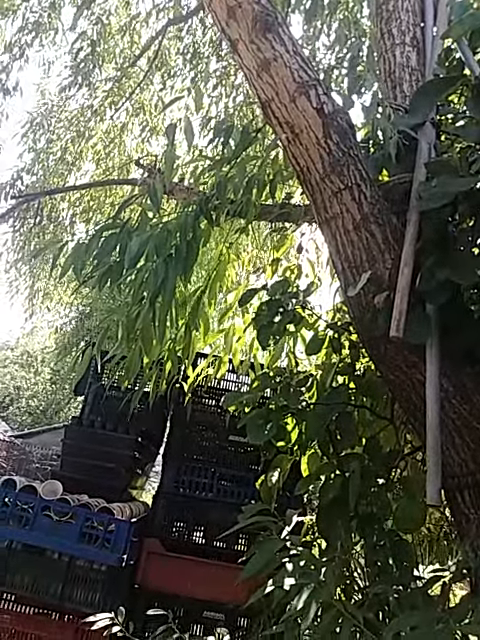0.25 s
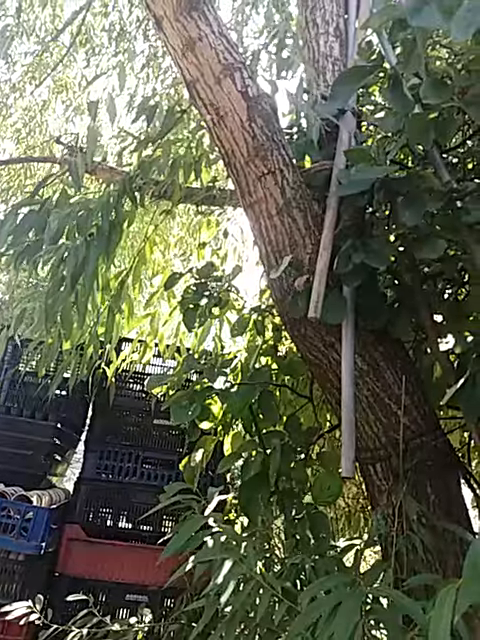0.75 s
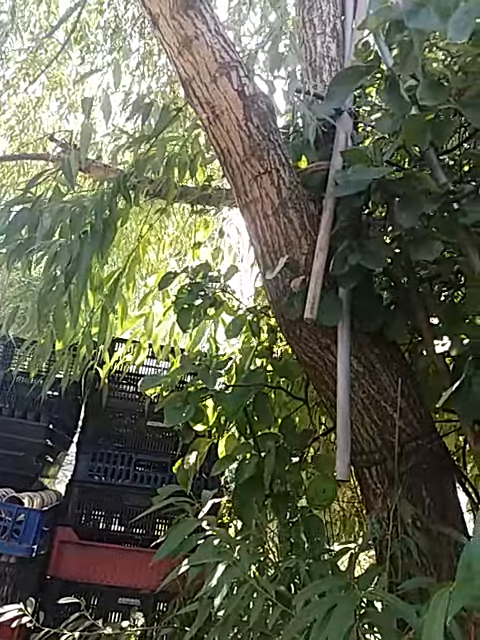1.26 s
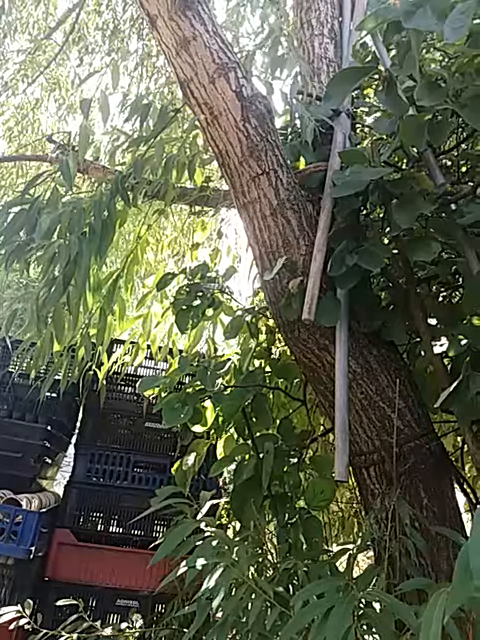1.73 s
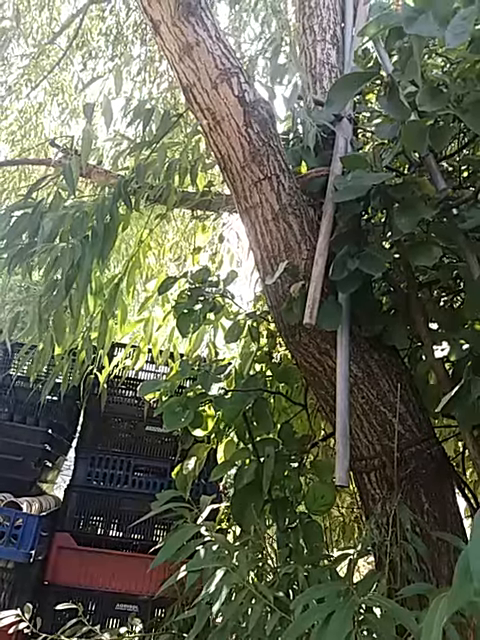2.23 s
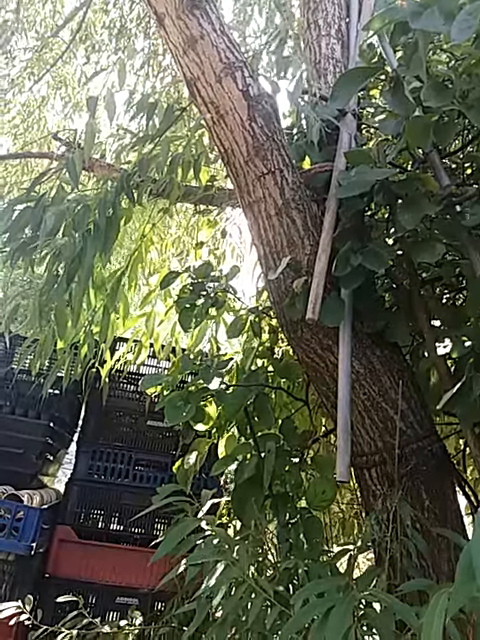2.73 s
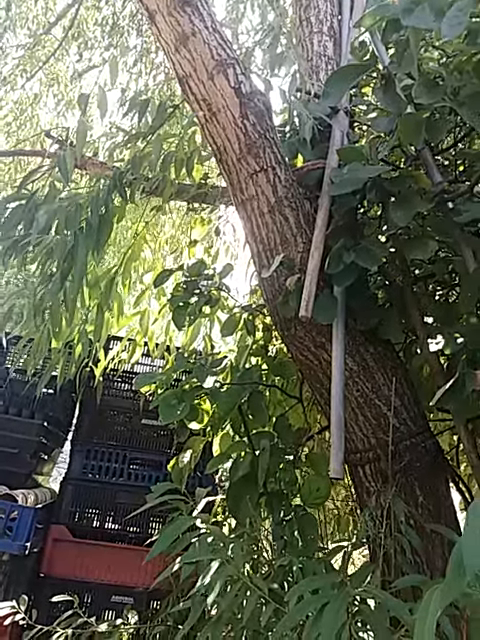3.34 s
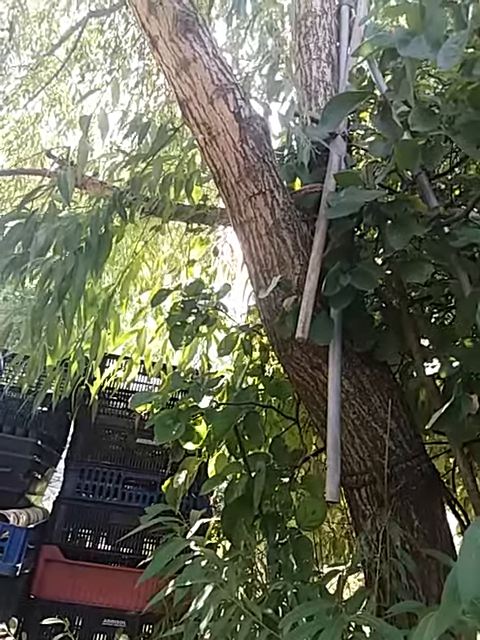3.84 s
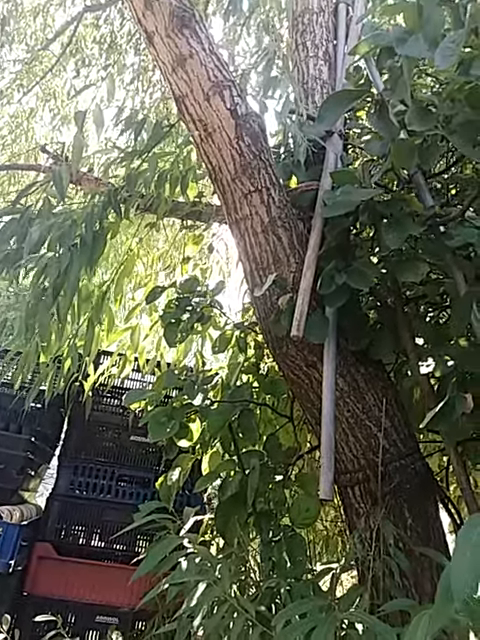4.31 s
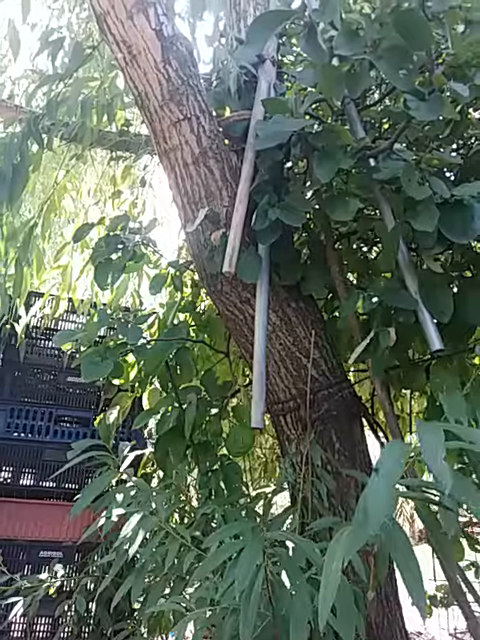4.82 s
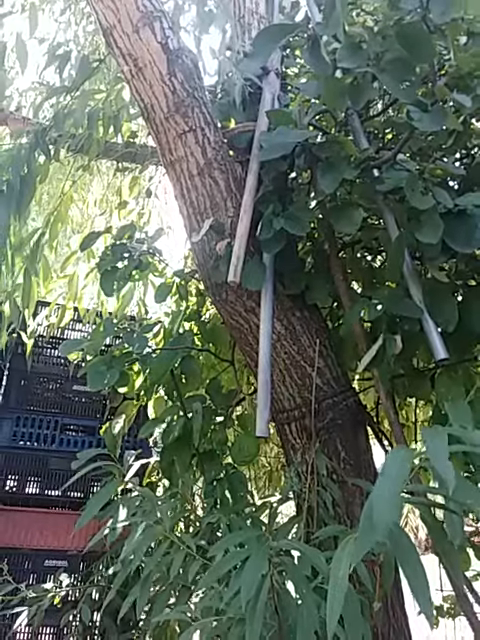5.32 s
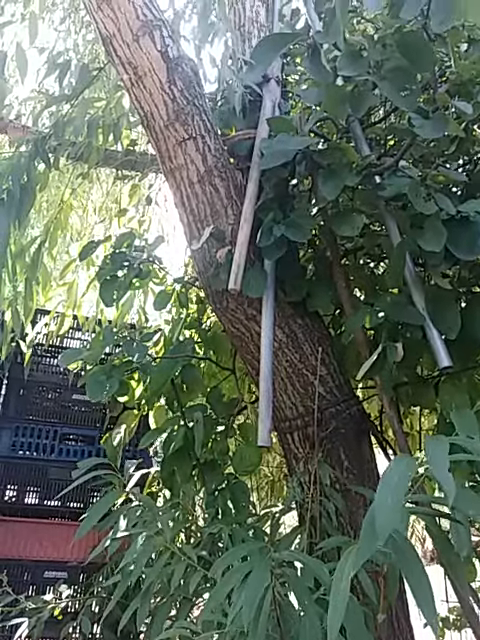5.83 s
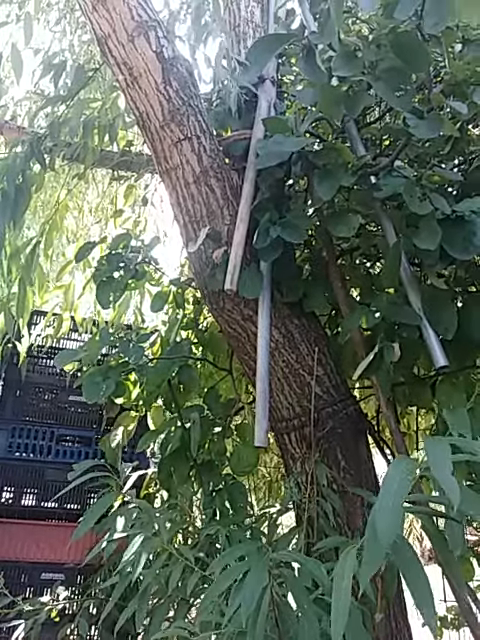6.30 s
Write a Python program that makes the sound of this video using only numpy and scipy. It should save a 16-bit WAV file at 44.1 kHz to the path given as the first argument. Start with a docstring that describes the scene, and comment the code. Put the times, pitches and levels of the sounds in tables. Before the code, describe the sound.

A quail repeats a crisp three-note whistled phrase about once a second in a quiet leafy yard, with soft echoes and faint hiss.

```python
"""A quiet outdoor floor is heard first, then the sound cuts in on a quail's phrase, 'wet-my-lips', in a leafy yard.
Each note is one pure whistle: a soft low lead-in, a hold near 1.8 kHz, then a snapping whip upward.
A husky murmur comes before the last note of each phrase. Echoes and scattered sound surround the bird.
Later a second take, with the bird heard from a new spot, cuts in mid-phrase.
Behind it are gliding far-bird chirps, short noise ticks and dull bumps, fluttering rumble and steady hiss."""
import sys
import numpy as np
from scipy import signal
from scipy.fft import rfft, irfft, next_fast_len
from scipy.io import wavfile
from scipy.ndimage import uniform_filter1d

SR = 44100
rng = np.random.default_rng(int(sys.argv[2]) if len(sys.argv) > 2 else 0)


def bounce(signal):
    """Save signal as a 16-bit WAV file at the path given by the first command-line argument."""
    frames = np.transpose(np.atleast_2d(signal))
    limited = np.clip(frames, -1, 1)
    pcm = np.round(limited * 32767).astype(np.int16)
    wavfile.write(sys.argv[1], SR, pcm)


N = 289296


def amp(db):
    """Turns decibels into a gain."""
    return 10 ** (np.asarray(db) / 20)


def evened(x):
    """Scales a sound to an average (rms) level of 1."""
    return x / np.sqrt(np.mean(x ** 2) + 1e-20)


def read(points, hz):
    """Reads a spectrum between its points, on a log-frequency axis."""
    f, value = np.transpose(points)
    return np.interp(np.log(hz + 1), np.log(f), value)


def colour(x, points):
    """Makes each frequency louder or softer by a spectrum in dB."""
    size = next_fast_len(len(x) + 2048)
    gain = amp(read(points, np.fft.rfftfreq(size, 1 / SR)))
    return irfft(rfft(x, size) * gain, size)[:len(x)]


def band(count, hz, octaves):
    """Makes noise whose spectrum is a bell around one frequency."""
    f = np.fft.rfftfreq(count, 1 / SR) + 1
    bell = np.exp(-.5 * (np.log2(f / hz) / octaves) ** 2)
    return evened(irfft(rfft(rng.standard_normal(count)) * bell, count))


def wander(count, per_s):
    """Joins random values by straight lines, per_s values each second."""
    t = np.arange(count) / SR
    knots = rng.standard_normal(4096)
    return np.interp(t * per_s, np.arange(len(knots)), knots)


def add(mix, s, sound):
    """Mixes a sound in, starting at s seconds."""
    part = mix[max(round(s * SR), 0):][:len(sound)]
    part += sound[:len(part)]


# Quail phrases: middle_note_s, level_db, opening_note_db (added to the level), held_pitch_hz,
# length_factor, murmur_level_db
QUAIL_PHRASES = [(0.4708, -15, -10, 1818, 1.07, -50), (1.4246, -14, -2.5, 1828, 1.12, -47.5),
                 (2.3548, -14, -3, 1824, 1.106, -47), (3.3443, -15, -2.5, 1828, 1.08, -47),
                 (4.6532, -15, -3, 1850, 1.04, -50.5), (5.6246, -15, -2.5, 1853, 1.09, -52),
                 (6.5695, -11.5, -3.5, 1850, .98, -53)]
# Notes of every phrase, 'wet', 'my', 'lips': offset_s from the middle note, pitch_factor, lead_in_db
THREE_NOTES = [(-.1838, .999, -6), (0, 1, 0), (.1413, 1.005, -1.5)]
# One more murmur after the first phrase: start_s, length_s, first_pitch_hz, last_pitch_hz, level_db
TRAILING_MURMUR = (.689, .075, 1086, 1150, -57)
# Edit cuts where each take of the bird opens abruptly: time_s
TAKE_OPENS = [0.333, 4.716]
# Colour of the direct path and echoes in each take: frequency_hz, gain_db
FIRST_PATH = [(1000, 0), (1600, -0.5), (1830, 1.5), (2100, -9), (2600, -0.1), (3200, -5), (4200, -0.8)]
SECOND_PATH = [(1000, -4), (1600, 0.5), (1830, 5.5), (2100, -3), (2600, -5.5), (3200, -11.5), (4200, -2.5)]
# Single echoes in each take: delay_ms, level_db
FIRST_ECHOES = [(2.42, -9.5), (5.57, -11), (8.39, -15), (16.08, -14), (35.61, -21), (41.27, -28),
                (107.7, -27)]
SECOND_ECHOES = [(1.73, -6.5), (8.07, -9.5), (14.72, -20), (16.63, -13.5), (35.03, -21), (84.8, -26),
                 (97.1, -29.5), (139, -30.5)]
SECOND_TAKE_S = 4.4  # calls from this time on belong to the second take
# The murmur: its start before the last note's whip, its length, and its pitch at each end
MURMUR_AHEAD_S, MURMUR_S, MURMUR_FROM_HZ, MURMUR_TO_HZ = .097, .08, 1010, 1043


def quail():
    """Sings three notes and a murmur per phrase, in two takes with different paths and echoes."""
    voice, t = np.zeros(N), np.arange(N) / SR
    for s, db, opening_db, hz, length, murmur_db in QUAIL_PHRASES:
        for k, (offset_s, pitch, lead_db) in enumerate(THREE_NOTES):
            note_db = db + opening_db * (k == 0)
            add(voice, *note(s + offset_s, note_db, hz * pitch, length, lead_db))
        murmur_start = s + THREE_NOTES[-1][0] - MURMUR_AHEAD_S
        add(voice, murmur_start, amp(murmur_db) * murmur(MURMUR_S, MURMUR_FROM_HZ, MURMUR_TO_HZ))
    s, length, first_hz, last_hz, db = TRAILING_MURMUR
    add(voice, s, amp(db) * murmur(length, first_hz, last_hz))
    first = yard(voice * (t < SECOND_TAKE_S), FIRST_PATH, FIRST_ECHOES, near_db=-3.0, far_db=-19.5)
    second = yard(voice * (t >= SECOND_TAKE_S), SECOND_PATH, SECOND_ECHOES, near_db=-4.5, far_db=-19.5)
    # each take is muted until its edit cut, then opens within 2 ms
    return sum(take * np.clip((t - cut) / .002, 0, 1) for take, cut in zip((first, second), TAKE_OPENS))


# Times here are stretched by the phrase's length factor; pitches are factors on the held pitch.
LEAD_S, LEAD_FROM, LEAD_TO, LEAD_DB = .017, .555, .71, -29  # soft low lead-in
HOLD_S, ATTACK_S, SCOOP_S = .0199, 0.016, .0033  # the whistle swells and scoops up to its held pitch
# Then it leaps along an S-curve: top pitch factor, steepest moment, time scale
WHIP_TOP, WHIP_MID_S, WHIP_S = 2.854, 0.0018, .0017
CREST_DB, CREST_S, RELEASE_S = 1.5, 0.0019, 0.0014  # a last push as it leaps, then it dies


def whistle(t):
    """Gives pitch factor, whistle gain and lead-in gain; t is in unstretched seconds from the whip."""
    held = np.maximum(t + HOLD_S, 0)
    lead = np.clip((t + HOLD_S + LEAD_S) / LEAD_S, 0, 1)
    pitch = LEAD_FROM + (LEAD_TO - LEAD_FROM) * lead
    pitch += (1 - LEAD_TO) * (1 - np.exp(-held / SCOOP_S))
    pitch += (WHIP_TOP - 1) / (1 + np.exp((WHIP_MID_S - t) / WHIP_S))
    attack = np.sin(np.pi / 2 * np.minimum(held / ATTACK_S, 1)) ** 2
    crest = amp(CREST_DB * np.exp(-.5 * (t / CREST_S) ** 2))
    release = np.exp(-.5 * (np.maximum(t, 0) / RELEASE_S) ** 2)
    return pitch, attack * crest * release, amp(LEAD_DB) * np.sin(np.pi * lead)


def note(s, db, hz, length, lead_db, hold_db=-1.86, jitter=0.014, hoarse=0.055, second_db=-55, third_db=-63,
         snap_db=0, snap_hz=2350, snap_s=0.00036, hiss_db=-62, hiss_hz=8100, fizz_db=-57, fizz_hz=6100):
    """A near-pure whistle that holds, then whips upward with a snap, with a trace of overtones and hiss."""
    whip = int((LEAD_S + HOLD_S) * length * SR)  # samples before the whip
    t = np.arange(-whip, SR // 100) / SR
    pitch, gain, lead_gain = whistle(t / length)
    low = t < -HOLD_S * length  # the lead-in is hoarse
    shake = 1 + (jitter + hoarse * low) * wander(len(t), 500)
    phase = 2 * np.pi * np.cumsum(hz * pitch * shake) / SR
    tone = np.sin(phase) + amp(second_db) * np.sin(2 * phase) + amp(third_db) * np.sin(3 * phase)
    tone += amp(hiss_db) * band(len(t), hiss_hz, .12)
    # a very short burst of tone at the whip, in step with the whistle there
    snap_shape = np.exp(-.5 * (t / snap_s) ** 2)
    snap = amp(snap_db) * snap_shape * np.sin(phase[whip] + 2 * np.pi * snap_hz * t)
    fizz = amp(fizz_db) * band(len(t), fizz_hz, 0.1) * np.exp(-.5 * (t / 0.0031) ** 2)
    body = tone * (amp(hold_db) * gain + amp(lead_db) * lead_gain)
    return s + t[0], amp(db) * (body + snap + fizz)


def murmur(length, first_hz, last_hz, rasp_db=4, rasp_hz=2250, husk_db=-4):
    """A low husky tone that swells, with noise around its pitch and a rasp above it."""
    tone = glide(length, first_hz, last_hz, rough=.045, swell_db=7)
    count = len(tone)
    noise = amp(rasp_db) * band(count, rasp_hz, 0.17) + amp(husk_db) * band(count, first_hz, 0.1)
    flicker = amp(3.0 * wander(count, 200))
    return (tone + noise * signal.windows.hann(count)) * flicker


def glide(length, first_hz, last_hz, rough, swell_db):
    """A wavering tone that slides in pitch and swells toward its end."""
    count = int(length * SR)
    hz = np.linspace(first_hz, last_hz, count) * (1 + rough * wander(count, 400))
    shape = signal.windows.tukey(count, .3) * amp(np.linspace(-swell_db, 0, count))
    return shape * np.sin(2 * np.pi * np.cumsum(hz) / SR)


# Colour of the scattered sound of the yard: frequency_hz, gain_db
SCATTER_COLOUR = [(1000, 0), (1600, 9), (1830, -4.5), (2100, 3.5), (2600, -5), (3200, -5), (4200, 2),
                  (4700, -1.5), (8000, 8.5)]


def yard(x, path, echoes, near_db, far_db, near_t60=0.21, far_t60=0.72, damping=0.5, clump_db=0.5):
    """Direct sound, single reflections, clumped scatter from close things and a faint far tail."""
    t = np.arange(SR) / SR
    direct = np.zeros(SR)
    direct[0] = 1
    for ms, db in echoes:
        direct[round(ms * SR / 1000)] += amp(db)
    # two sets of random reflections, about 2000 a second, uneven in strength
    signs = rng.choice([-1., 1.], (2, SR))
    present = rng.random((2, SR)) < 2000 / SR
    taps = signs * present * amp(clump_db * wander(SR, 180))
    near = taps[0] * amp(-60 * t / near_t60) * (t > .002)
    hz, at, z = signal.stft(taps[1], SR, nperseg=256)
    t60 = far_t60 * (np.maximum(hz, 1800) / 1800)[:, None] ** -damping  # leaves soak up the treble
    far = signal.istft(z * amp(-60 * at / t60), SR, nperseg=256)[1][:SR]
    far = far * np.minimum(t / 0.026, 1)
    tail = amp(near_db) * near / np.linalg.norm(near) + amp(far_db) * far / np.linalg.norm(far)
    reflected = signal.fftconvolve(colour(x, path), direct)[:N]
    scattered = signal.fftconvolve(colour(x, SCATTER_COLOUR), tail)[:N]
    return reflected + scattered


# Chirps of far small birds: start_s, length_s, first_pitch_hz, last_pitch_hz, level_db
FAR_CHIRPS = [(1.793, 0.079, 3440, 3780, -66), (3.019, 0.14, 3923, 3108, -67.5),
              (3.864, .11, 4250, 3330, -71.5), (4.192, 0.0574, 3384, 3315, -73.5),
              (4.613, 0.1, 2620, 2670, -66.5)]
# Small ticks: time_s, centre_hz, width_octaves, length_s, level_db
SMALL_TICKS = [(0.347, 3026, 1.8, 0.00073, -70), (1.189, 6500, 0.89, 0.0012, -58.5),
               (4.118, 2300, 0.46, 0.0044, -68), (5.06, 7845, 0.21, 0.00063, -47),
               (5.096, 6110, 0.11, 0.00077, -60)]
# Soft dull bumps: time_s, centre_hz, width_octaves, length_s, level_db
DULL_BUMPS = [(0.471, 170, .45, 0.045, -61), (0.601, 523, 0.67, 0.007, -58),
              (2.85, 181, 0.41, 0.034, -62.5), (3.74, 85, 0.346, 0.02, -61), (4.85, 84.6, .4, 0.031, -64),
              (5.99, 70.3, .4, .025, -58.5), (6.48, 69.6, .5, 0.049, -60)]


def small_sounds():
    """Far chirps are gliding tones; ticks and bumps are short puffs of narrow noise."""
    out = np.zeros(N)
    for s, length, first_hz, last_hz, db in FAR_CHIRPS:
        add(out, s, amp(db) * glide(length, first_hz, last_hz, rough=0.075, swell_db=6.5))
    t = np.arange(-SR // 4, SR // 4) / SR
    for s, hz, octaves, length, db in SMALL_TICKS + DULL_BUMPS:
        puff = band(len(t), hz, octaves) * np.exp(-.5 * (t / length) ** 2)
        add(out, s + t[0], amp(db) * puff)
    return out


# Shape of the distant rumble and rustle: frequency_hz, relative_level_db (per Hz)
AIR_COLOUR = [(20, -31.5), (35, -15.5), (55, -1), (80, 1.5), (150, -3.5), (260, -1), (360, -9), (510, -6),
              (850, -14), (1800, -15), (2700, -24), (3800, -28.5), (5000, -38.5), (9000, -69)]
AIR_DB = -60.5  # before the low part is turned down and flutters


def air(split_hz=900, flutter_db=1.5, rumble_db=-3):
    """Outdoor floor: coloured noise whose low part flutters while the rest stays even."""
    noise = amp(AIR_DB) * evened(colour(rng.standard_normal(N), AIR_COLOUR))
    low = signal.sosfiltfilt(signal.butter(2, split_hz, fs=SR, output="sos"), noise)
    return noise - low + low * amp(rumble_db + flutter_db * wander(N, 18))


# Shape of the microphone hiss: frequency_hz, relative_level_db (per Hz)
HISS_COLOUR = [(3000, -3), (6000, -3), (8000, -1.5), (11000, 0), (15000, -0.5)]
HISS_DB = -73.5  # before the noise suppressor lifts it


def microphone_hiss():
    """Steady coloured noise from the microphone."""
    return amp(HISS_DB) * evened(colour(rng.standard_normal(N), HISS_COLOUR))


def scene():
    """Everything at the microphone."""
    return (quail() + small_sounds() + air() + microphone_hiss())[None]


EDGE_HZ = 15750  # upper limit of the sound


def record(dry, open_db=-55, lift_db=5.0, bass_lift_db=3, smooth_s=0.026):
    """A noise suppressor lifts treble and bass during and just after loud sound; then the band limit."""
    power_db = 10 * np.log10(abs(uniform_filter1d(dry[0] ** 2, size=800)) + 1e-12)
    loud = np.clip((power_db - open_db) / 12 + .5, 0, 1)
    r = np.exp(-1 / (smooth_s * SR))
    opened = np.minimum(1.2 * signal.lfilter([1 - r], [1, -r], loud), 1)  # opens and closes smoothly
    treble = colour(dry[0], [(3800, -60), (4500, -12), (5200, 0)])
    bass = colour(dry[0], [(600, 0), (850, -10), (1100, -60)])
    out = dry + treble * (amp(lift_db * opened) - 1) + bass * (amp(bass_lift_db * opened) - 1)
    low_pass = signal.firwin(511, EDGE_HZ, window=("kaiser", 9), fs=SR)
    return signal.oaconvolve(out, low_pass[None], "same")


dry = scene()
out = record(dry)
bounce(out)
```